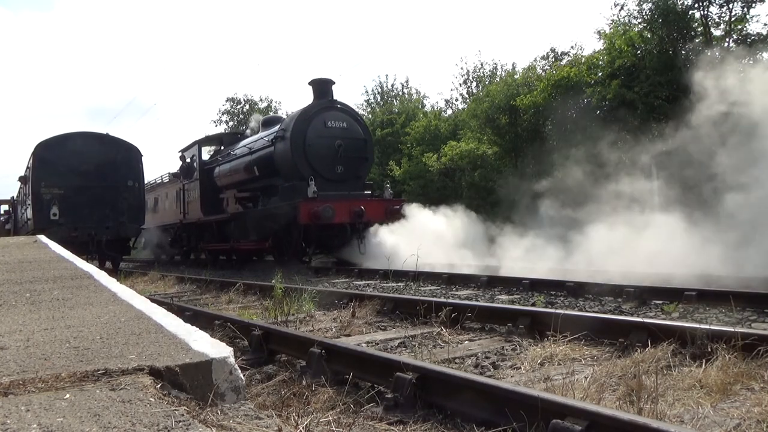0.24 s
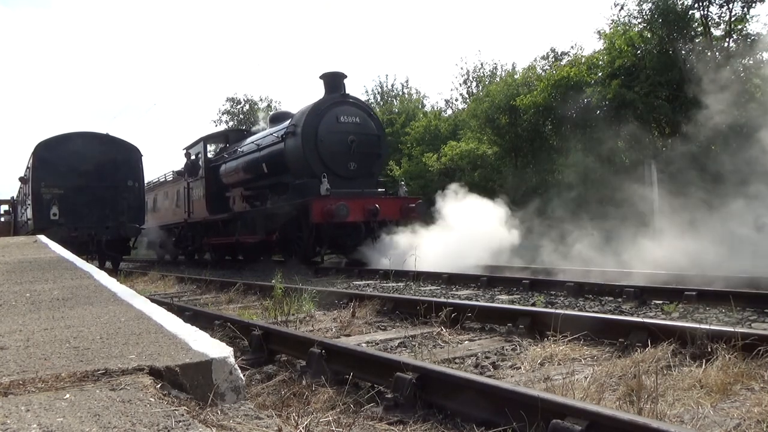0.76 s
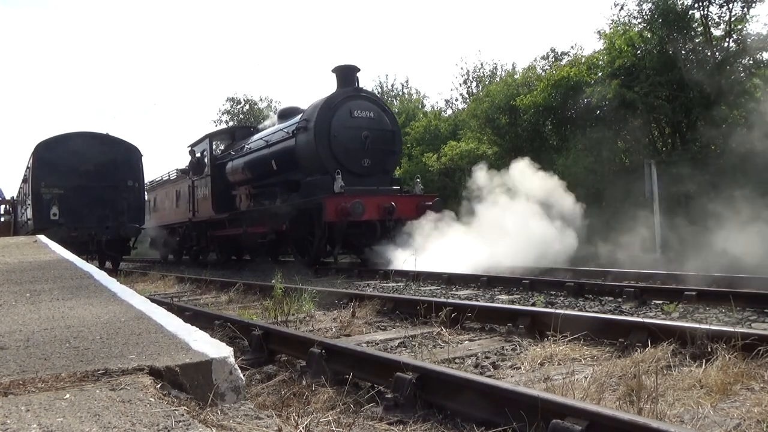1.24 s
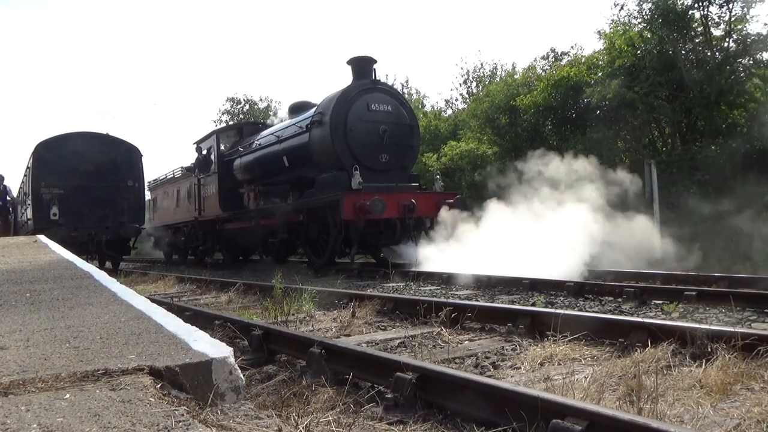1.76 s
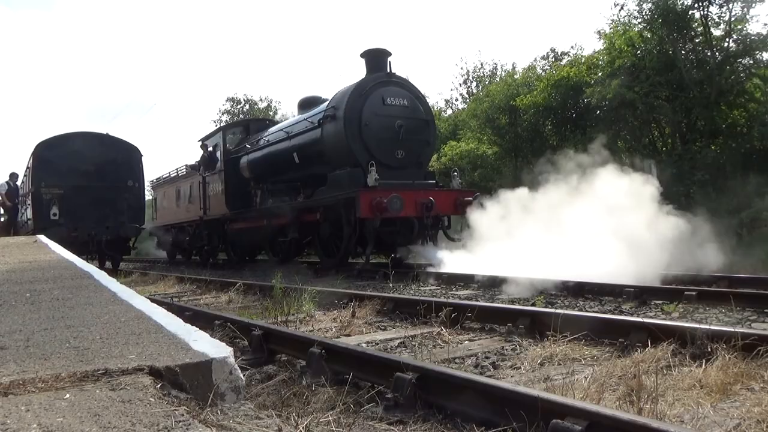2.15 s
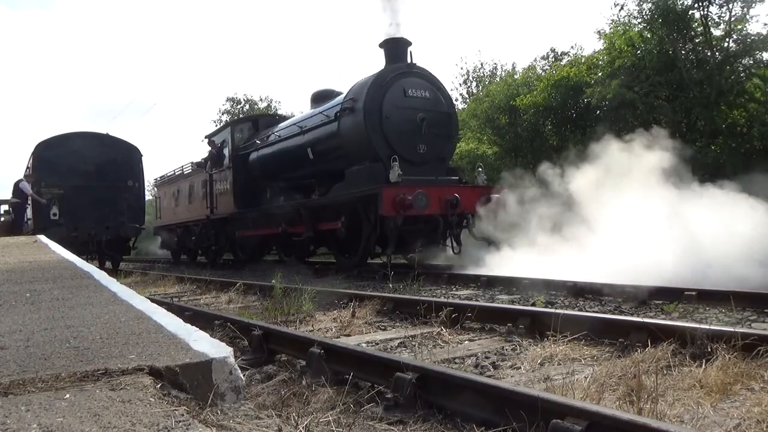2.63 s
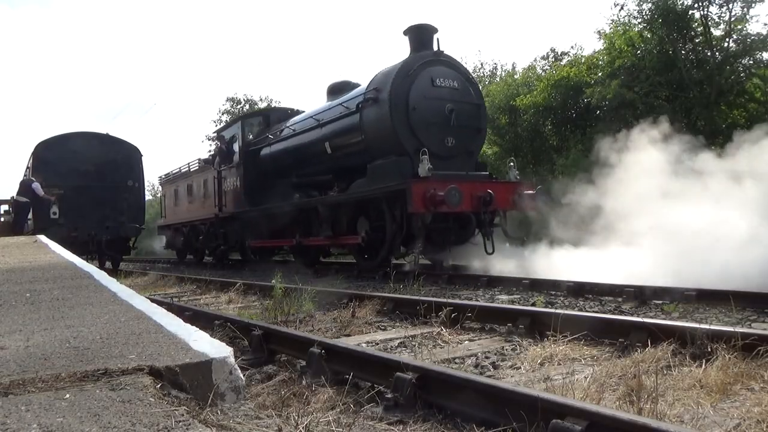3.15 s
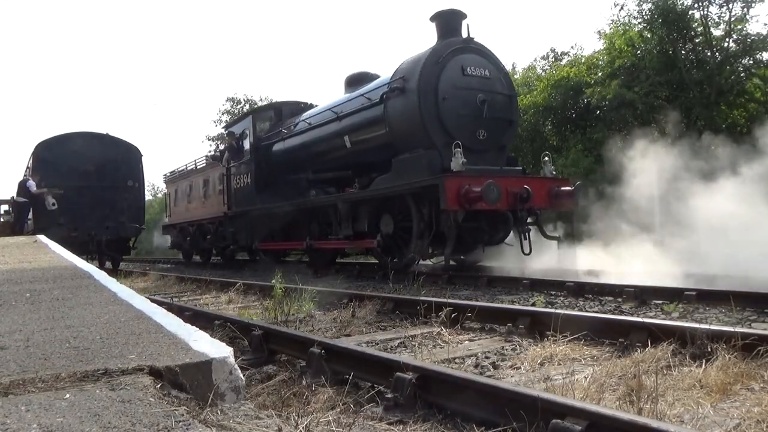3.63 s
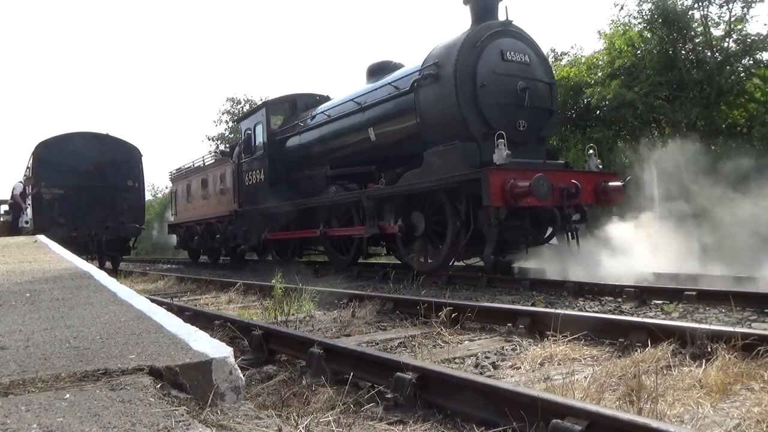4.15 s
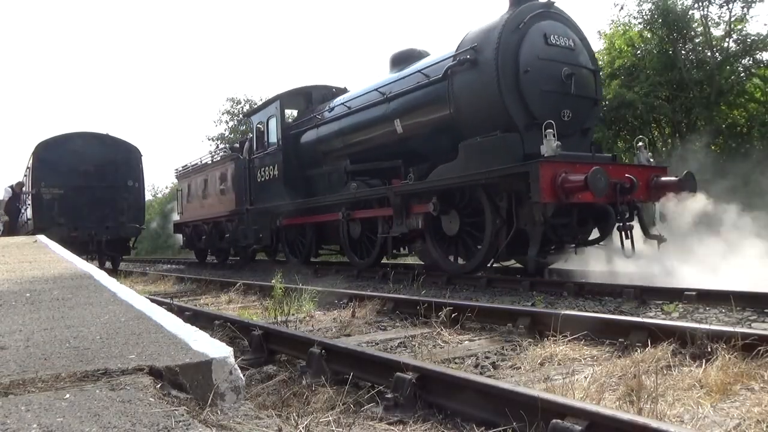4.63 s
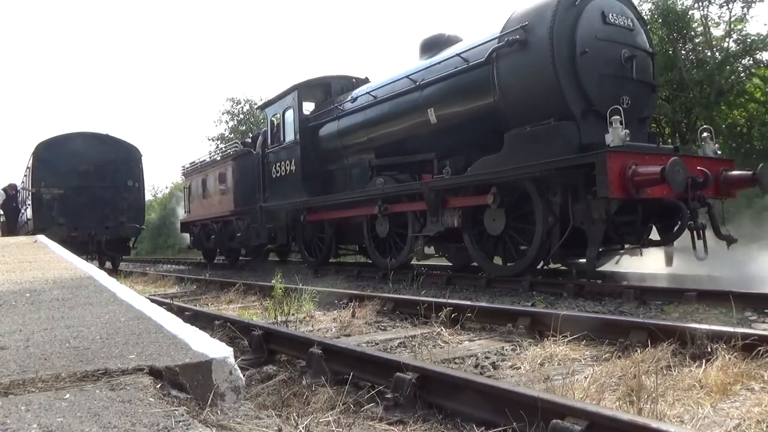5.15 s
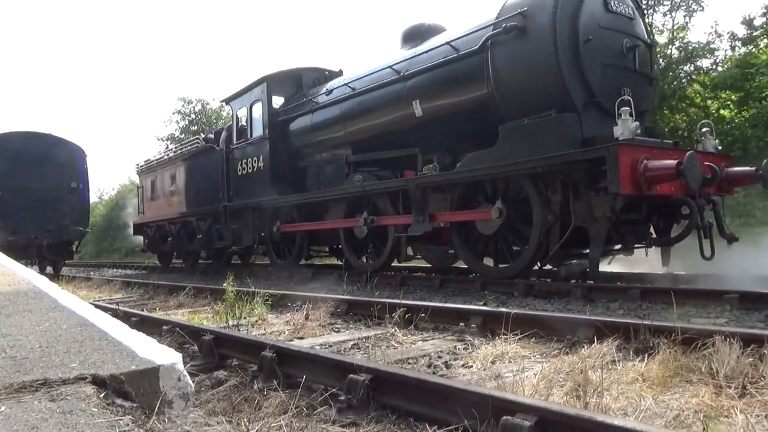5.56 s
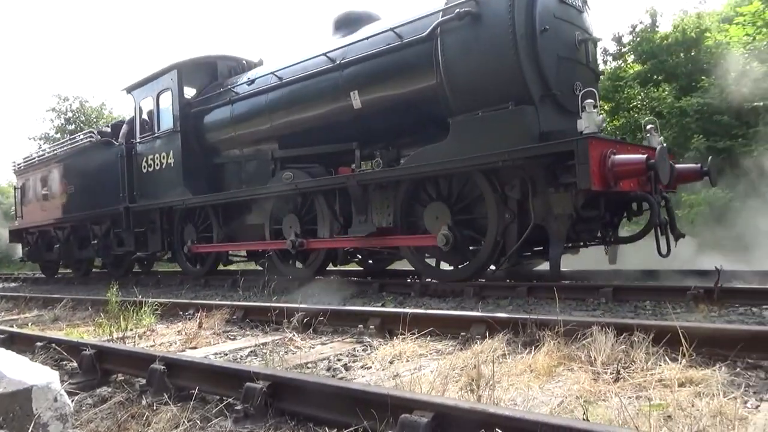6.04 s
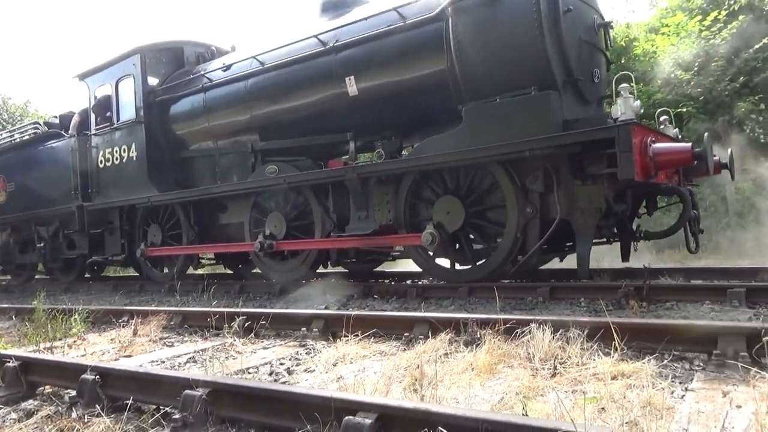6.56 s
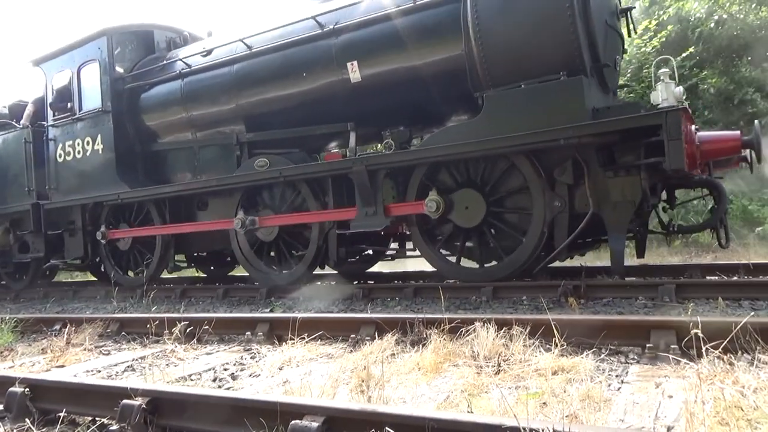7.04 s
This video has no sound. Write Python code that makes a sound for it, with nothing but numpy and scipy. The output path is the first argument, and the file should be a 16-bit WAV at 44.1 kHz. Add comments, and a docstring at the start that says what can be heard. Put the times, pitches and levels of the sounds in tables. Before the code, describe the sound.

Piercing steam jet hisses for three seconds, stops dead, leaving soft puffs and low murmur before heavy wheels shudder, knock and clank up close.

```python
"""Beside a railway track: a steam locomotive creeps closer, its cylinder drain cocks blowing hard.
The jet is noise in three bands, recoloured as the pistons move; it shuts off suddenly, then puffs softly.
The wheels rumble, knock and grind: judder noise through track and steel filters, and blows on resonances.
Sharp steel clanks add broadband cracks and thin rings. A low boiler murmur swells with the exhaust beats."""
import sys
import numpy as np
from scipy import signal
from scipy.fft import rfft, irfft, next_fast_len
from scipy.io import wavfile
from scipy.ndimage import uniform_filter1d, minimum_filter1d, map_coordinates

SR = 44100
rng = np.random.default_rng(int(sys.argv[2]) if len(sys.argv) > 2 else 0)


def digitize_waveform(pressure):
    """Quantize a signal to 16-bit integers and store it at the path in sys.argv[1].

    Rows of a 2-D input are taken as channels; values are limited to [-1, 1].
    """
    field = np.atleast_2d(pressure).T
    bounded = np.clip(field, -1, 1)
    quanta = np.round(bounded * 32767).astype(np.int16)
    wavfile.write(sys.argv[1], SR, quanta)


N = 321930

# wheel and rail resonances: (frequency [Hz], width [Hz], relative level [dB])
WHEEL_MODES = [(548, 73, 1.5), (830, 100, 0), (937, 32, 5.5), (1151, 105, 1), (1371, 66, 0.5),
               (1512, 27, -1), (1644, 98, -1.5), (1810, 71, 0), (2143, 85, -5.5), (2900, 770, -15.5),
               (3650, 780, -20)]
# colour of the track's thud: (frequency [Hz], relative level [dB])
TRACK_COLOUR = [(25, -32), (60, -49), (110, -16.5), (200, -4), (290, 0), (380, -2.5), (480, -4),
                (590, -13.5), (720, -22), (1500, -35), (4000, -66)]
# weight on the nearby rail as the engine arrives: (time [s], load [0-1])
RAIL_LOAD = [(5.4, 0), (6.1, .35), (6.24, .85), (6.85, .85), (7, 1)]


def amp(db):
    """Decibels to gain."""
    return 10 ** (np.asarray(db) / 20)


def unit(x):
    """Scale to rms 1."""
    return x / np.sqrt(np.mean(x ** 2) + 1e-20)


def along(points, hz):
    """Interpolate (Hz, value) points on a log axis."""
    f, v = np.transpose(points)
    return np.interp(np.log(hz + 1), np.log(f + 1), v)


def curves(rows, at_s=None):
    """Each column after the time, per sample or at the given times."""
    s, *cols = np.transpose(rows)
    if at_s is None:
        at_s = np.arange(N) / SR
    return [np.interp(at_s, s, c) for c in cols]


def wobble(rate_hz):
    """A smooth random curve, rate_hz knots a second."""
    knots = rng.standard_normal(int(N * rate_hz / SR) + 4)
    return map_coordinates(knots, [np.arange(N) * rate_hz / SR])


def filtered(x, response):
    """Filter x by a complex response of frequency."""
    n = x.shape[-1]
    m = next_fast_len(n + 8192, True)
    return irfft(rfft(x, m) * response(np.fft.rfftfreq(m, 1 / SR)), m)[..., :n]


def add(track, s, sound):
    """Mix a sound into a track at s seconds."""
    part = track[:, round(s * SR):][:, :sound.shape[-1]]
    part += sound[:, :part.shape[-1]]


def stereo(pair):
    """Two unrelated signals become mid and side; the side's share depends on frequency."""
    # (frequency [Hz], side to mid [dB])
    side_db = [(30, -9), (70, -18), (250, -31), (550, -13), (1100, -11.5), (2200, -34), (4500, -39),
               (8000, -36), (14000, -45)]
    mid = pair[0]
    side = filtered(pair[1], lambda hz: amp(along(side_db, hz)))
    return np.array([mid + side, mid - side])


def turbulence(shape, spread, patchy_db):
    """Stereo noise whose gain is shape(s, Hz), with drifting patches of random gain."""
    hz, s, z = signal.stft(rng.standard_normal((2, N)), SR, nperseg=512)
    field = uniform_filter1d(rng.standard_normal(z.shape[1:]), size=2, axis=0)
    field = uniform_filter1d(field, size=18, axis=1)
    mid, side = z * (shape(s, hz[:, None]) * amp(patchy_db * unit(field)))
    side = side * amp(along(spread, hz[:, None]))
    return signal.istft(np.array([mid + side, mid - side]), nperseg=512)[1][:, :N]


def steam(roar_edge_hz=3590, fizz_edge_hz=8520, pipe_hz=3050, pipe_width_hz=110):
    """Large eddies roar, small ones hiss and fizz; the opening sets the colour of all three."""
    # jet colours: (frequency [Hz], relative level [dB])
    narrow = [(450, -54), (850, -32), (1600, -16.0), (2000, -13.0), (2450, -16), (3300, -11.0),
              (4100, -2.5), (4900, 0.5), (5700, -1.5), (7300, -0.5), (8700, -5), (10200, -4),
              (12500, -16.0), (15500, -24.5)]
    wide = [(450, -55), (800, -32), (1050, -20.5), (1700, -9), (3050, -1.5), (4700, 1), (5600, -5.5),
            (6400, -1), (7500, -2), (8300, -5.5), (8950, -14), (10100, -6), (12000, -19.5), (15500, -28)]
    closing = [(450, -59), (850, -26.5), (1250, -17), (1900, -9.5), (3000, -3.5), (3600, -8.5),
               (5300, -7.5), (6200, -2), (7200, -2), (8700, -8.5), (9900, -5.5), (11000, -10), (12500, -14),
               (15500, -25)]
    spent = [(450, -20), (750, -15.5), (1200, -4), (1700, 1.5), (2400, 2), (3700, -3.5), (5700, -5.5),
             (7100, -2.5), (8800, -9), (10300, -10.5), (12500, -18), (15500, -35)]
    # (time [s], colour [0 narrow, 1 wide, 2 closing, 3 spent])
    stage_rows = [(0, 0), (1, 0), (1.1, 1), (1.65, 1), (2.1, 1.25), (2.35, 1.55), (2.7, 2), (3.3, 2),
                  (3.42, 3), (3.75, 2.8), (3.95, 2.1), (4.25, 3)]
    # drain pipe's narrow resonance: (time [s], relative boost [dB])
    pipe_rows = [(0, -3), (1.2, 2), (2.3, 1.5), (2.7, 5.5), (3.3, 0)]
    # (frequency [Hz], side to mid [dB])
    jet_side_db = [(700, -16), (1200, -25), (2200, -36), (4500, -42), (14000, -42)]
    # (time [s], left minus right [dB])
    pan_rows = [(0, 0), (4, 0), (4.5, -.8), (4.85, -2.7), (5.7, -2.4), (5.9, -.5)]

    def below(hz, edge_hz):
        return 1 / (1 + (hz / edge_hz) ** 16)

    def shape(s, hz):
        stage, = curves(stage_rows, s)
        tint_db = 0
        for k, points in enumerate([narrow, wide, closing, spent]):
            blend = np.clip(1 - np.abs(stage - k), 0, 1)  # neighbouring colours melt together
            tint_db = tint_db + blend * along(points, hz)
        pipe_db, = curves(pipe_rows, s)
        tint = amp(tint_db) * amp(pipe_db / (1 + ((hz - pipe_hz) / pipe_width_hz) ** 2))
        under_roar, under_fizz = below(hz, roar_edge_hz), below(hz, fizz_edge_hz)
        shares = [under_roar, under_fizz - under_roar, 1 - under_fizz]
        power = 0
        for share, level_db in zip(shares, jet_levels(s)):
            eddies = np.abs(share) * tint ** 2
            flutter_db = 0.43 * unit(uniform_filter1d(rng.standard_normal(len(s)), size=4))
            power = power + eddies / eddies.mean(axis=0) * amp(level_db + flutter_db) ** 2
        return np.sqrt(power)

    pan_db, = curves(pan_rows)
    jet = turbulence(shape, jet_side_db, patchy_db=1.52)
    return amp(0.06) * jet * amp(np.array([pan_db, -pan_db]) / 2)


def jet_levels(s):
    """Roar, hiss and fizz in dB: leak, blasts and puffs add in power; exhaust beats rob hiss and fizz."""
    # steady leak: (time [s], roar [dB], hiss [dB])
    leak_rows = [(4.45, -46, -48), (4.64, -52.5, -51.5), (4.78, -45.5, -45.5), (5.45, -47.5, -47.5),
                 (5.8, -54, -49.5), (6.4, -49.5, -50), (7.3, -48, -46)]
    # one blast per port opening, levels at mid-blast:
    # (opens [s], shuts [s], roar [dB], hiss [dB], fizz [dB], sharpening [dB/s])
    blast_rows = [(-0.2, 1.07, -41, -27, -32.5, -3.5), (1.04, 2.224, -29.5, -27.3, -37.5, 1.5),
                  (2.23, 2.514, -31, -27.8, -33.7, 5), (2.53, 3.306, -37, -26.5, -33.5, 10.5)]
    # low-pressure puffs: (peak [s], rise [s], fall [s], roar [dB], hiss [dB], fizz [dB])
    puff_rows = [(3.42, 0.17, 0.29, -49.5, -39, -47.5), (3.98, 0.11, 0.052, -45.5, -31.5, -45.5),
                 (4.15, 0.095, 0.15, -44.5, -34, -43.5), (4.315, 0.061, 0.054, -36.5, -48, -63),
                 (4.96, 0.078, 0.052, -40.5, -40.5, -56), (5.06, 0.087, 0.063, -44.5, -39, -53.5),
                 (5.69, 0.11, 0.035, -47, -42.5, -62)]
    # fizz brightens and dulls: (time [s], added level [dB])
    fizz_rows = [(0.1, 0.5), (0.33, -1), (0.58, 1), (0.68, -2.5), (0.86, 2.5), (1.0, 0.5), (1.25, -1),
                 (1.5, -0.8), (1.9, -0.5)]
    leak_fizz_db = -11  # relative to the leak's hiss
    open_s, shut_s = 0.011, 0.011  # time scales of the port's edges
    hiss_share, fizz_share = 0.18, 0.15  # gain per dB the roar loses as the jet sharpens
    rob_db, rob_at_db = 2.5, -51.5  # loss caused by a beat of this level

    def bands(*levels_db):
        return amp(np.reshape(np.broadcast_arrays(*levels_db), (3, -1))) ** 2

    def gate(u):
        return (1 + np.tanh(u / 2)) / 2

    roar, hiss = curves(leak_rows, s)
    power = bands(roar, hiss, hiss + leak_fizz_db)
    for opens, shuts, roar, hiss, fizz, sharpening in blast_rows:
        port = gate((s - opens) / open_s) * gate((shuts - s) / shut_s)
        shift_db = sharpening * (np.clip(s, opens, shuts) - (opens + shuts) / 2)
        blast = bands(roar - shift_db, hiss + hiss_share * shift_db, fizz + fizz_share * shift_db)
        power = power + port * blast
    for peak, rise, fall, roar, hiss, fizz in puff_rows:
        swell = np.exp(-((s - peak) / np.where(s < peak, rise, fall)) ** 2)
        power = power + swell * bands(roar, hiss, fizz)
    roar, hiss, fizz = 10 * np.log10(power)
    robbed_db = rob_db * np.sqrt(exhaust(s)) / amp(rob_at_db)
    return roar, hiss - robbed_db, fizz - robbed_db + curves(fizz_rows, s)[0]


def exhaust(s, rise_s=0.037):
    """Power of the exhaust beats: each swells quickly, peaks after rise_s and dies away."""
    # soft beats: (start [s], peak level [dB])
    chuff_rows = [(1.02, -53.5), (1.6, -50.5), (2.09, -57), (2.47, -50), (3.34, -65), (4.03, -51.5)]
    power = 0
    for start, db in chuff_rows:
        age = np.maximum(s - start, 0) / rise_s
        power = power + (amp(db) * age * np.exp(1 - age)) ** 2
    return power


def leaning(pair):
    """The jet's left-right treble balance shifts as it draws near."""
    # far and near balance: (frequency [Hz], left minus right [dB])
    far_db = [(3500, -0.2), (4500, 0.3), (6200, 0.8), (8000, 2.1), (8900, 0)]
    near_db = [(8700, 0), (9400, -2.5), (11000, -2.3), (12000, 0)]
    # (time [s], nearness [0 far, 1 near])
    near_rows = [(1, 0), (2.1, 0.35), (2.6, 1)]

    def lean(points):
        return filtered(pair, lambda hz: amp(np.outer([1, -1], along(points, hz)) / 2))

    near = np.clip(curves(near_rows)[0], 0, 1)
    return (1 - near) * lean(far_db) + near * lean(near_db)


def steel(hz):
    """Response of the ringing wheel and rail: resonances of alternating sign."""
    total = 0
    for k, (center, width, db) in enumerate(WHEEL_MODES):
        damping = 1j * hz * width
        total = total + (-1) ** k * amp(db) * damping / (center * center - hz * hz + damping)
    return total


def rolling():
    """Juddering tyres: the track drones hollowly, rumbles more under load; wheels grind at their own level."""
    # (time [s], relative rumble [dB], grinding [dB])
    roll_rows = [(3.4, -80, -86.5), (4.1, -62, -61), (5.08, -58.5, -65), (5.25, -36, -63), (5.42, -50, -52),
                 (5.68, -32, -56), (5.9, -34.5, -44.5), (6.18, -40, -60), (6.4, -50, -42.5),
                 (6.58, -43, -51), (6.82, -32, -41.5), (6.95, -28.5, -33), (7.08, -28.5, -29),
                 (7.3, -29, -37)]
    hollow_db = [(100, -29.5), (230, -8), (300, -4.5), (350, -0.5), (430, -12.0), (900, -60)]
    rumble_db, grind_db = curves(roll_rows)
    load, = curves(RAIL_LOAD)
    contact = stereo(rng.standard_normal((2, N)))
    judder = amp(2.5 * wobble(55)) * contact
    slips = amp(2.6 * wobble(70)) * contact  # the flange sticks and slips in short scrapes
    hollow = unit(filtered(judder, lambda hz: amp(along(hollow_db, hz))))
    rumble = unit(filtered(judder, lambda hz: amp(along(TRACK_COLOUR, hz))))
    grind = unit(filtered(slips, steel))
    track = amp(-4.5) * hollow + load * amp(-11.0) * rumble
    return amp(rumble_db) * track + amp(grind_db) * grind


def burst(response, t60, attack):
    """A contact chatters briefly into a body; rms 1 over its first 20 ms."""
    t = np.arange(SR // 5) / SR
    force = rng.standard_normal((2, len(t))) * amp(-60 * t / max(t60, .005)) * (1 - np.exp(-t / attack))
    sound = filtered(force, response)
    return sound / sound[:, :SR // 50].std(axis=1, keepdims=True)


def boom(hz, t60, rise):
    """One resonance, set ringing by a short, smooth push."""
    t = np.arange(SR // 5) / SR
    phase = rng.uniform(0, 2 * np.pi, (2, 1))
    return np.sin(2 * np.pi * hz * t + phase) * (amp(-60 * t / t60) * (1 - np.exp(-t / rise)) ** 2)


def blow(s, hz, thud_db, ring_db, t60=0.11):
    """A blow booms in the track and rings the wheel; the more load, the broader the thud."""
    load, = curves(RAIL_LOAD, s)
    broad_db = -19 + 12 * load
    broad = burst(lambda f: amp(along(TRACK_COLOUR, f)), t60, attack=0.0018)
    thud = amp(-2.0) * boom(hz, t60, rise=0.0022) + amp(broad_db) * broad
    # every blow finds a new mix of the wheel's modes; narrow ones ring longest
    ring = 0
    for center, width, db in WHEEL_MODES:
        gain = amp(db + rng.normal(0, 10.0))
        ring = ring + gain * boom(center * rng.normal(1, 0.015), 7.2 / width, rise=0.00047)
    scrape = burst(steel, t60=0.17, attack=.0005)
    wheel = amp(-11.0) * ring / ring[:, :SR // 50].std() + amp(-6) * scrape
    return amp(thud_db) * thud + amp(ring_db) * wheel


def shudders(ring_db=-22, gap_shrink=0.88, t60=0.1):
    """A shuddering tyre's runs of soft thumps, ever closer, boom in the track and barely stir the wheel."""
    # (start [s], count, first gap [s], first thump [relative dB], loss per thump [dB], mean pitch [Hz])
    shudder_rows = [(5.093, 2, 0.036, -37, -3.5, 327), (5.162, 2, 0.02, -24.5, 10, 322),
                    (5.224, 4, 0.032, -25, 2, 307), (5.435, 2, 0.04, -34, -13.5, 322),
                    (5.495, 1, 0.02, -20, 2, 340), (5.552, 2, 0.017, -20, -0.5, 355),
                    (5.608, 3, 0.021, -16.5, 2, 306), (5.679, 3, 0.051, -18, 5, 316),
                    (6.08, 5, 0.031, -20, 1.3, 331)]
    track = np.zeros((2, N))
    for s, count, gap, first_db, loss_db, hz in shudder_rows:
        for k in range(round(count)):
            db = first_db - loss_db * k
            add(track, s, blow(s, hz * rng.normal(1, .04), db, db + ring_db, t60))
            s = s + gap * gap_shrink ** k
    return stereo(track)


def knocks(count=4, rattle_s=0.025):
    """Slack in the running gear takes up with dull blows; loose fittings rattle within rattle_s of each."""
    # (time [s], relative thud [dB], relative ring [dB], pitch [Hz])
    knock_rows = [(5.822, -15, -35.5, 253), (5.938, -17, -33, 260.6), (5.997, -18, -41.5, 220),
                  (6.237, -18.5, -28, 414), (6.293, -20, -28, 435), (6.38, -25, -32, 353),
                  (6.913, -24.5, -28, 408), (6.944, -33, -26.5, 380), (7.034, -25, -28.5, 374),
                  (7.151, -38, -20.5, 326)]
    # colour of the fittings: (frequency [Hz], relative level [dB])
    rattle_db = [(700, -16), (1700, 7), (3500, -10), (5000, -20), (12000, -35)]
    track = np.zeros((2, N))
    for s, thud_db, ring_db, hz in knock_rows:
        add(track, s, blow(s, hz, thud_db, ring_db))
        for delay in rattle_s * rng.random(count):
            tick = burst(lambda f: amp(along(rattle_db, f)), t60=0.02, attack=0.00039)
            add(track, s + delay, amp(ring_db + rng.normal(-15, 1.6)) * tick)
    return stereo(track)


def clanks(thud_hz=375, ring_db=-8.5, thud_lag_s=0.00198):
    """Hard contacts crack over the whole band, ring thinly in the rods and thud into the track just after."""
    # (time [s], relative crack [dB], relative thud [dB], rod's ring [Hz])
    clank_rows = [(5.8389, -25, -38, 4130), (5.9033, -28.5, -33, 4980), (6.0938, -21, -23.5, 4470),
                  (6.3409, -21, -19.5, 3980), (6.5933, -19.5, -15, 5030), (6.7372, -21, -17, 3960),
                  (6.8454, -24, -16.5, 3860), (6.965, -21, -19, 3950), (7.078, -22.5, -19.5, 6800),
                  (7.1303, -23, -18.5, 3970), (7.217, -22.5, -18.5, 3830), (7.2851, -22, -19.5, 4000)]
    # (frequency [Hz], relative level [dB])
    crack_colour = [(200, -13), (600, -2.5), (2000, 4.5), (4500, 1), (8500, 0), (11000, -8), (15500, -27)]
    track = np.zeros((2, N))
    for s, crack_db, thud_db, rod_hz in clank_rows:
        crack = burst(lambda hz: amp(along(crack_colour, hz)), t60=0.085, attack=0.00032)
        add(track, s, amp(crack_db - 11.0) * crack)
        add(track, s, amp(crack_db - 20.0) * boom(rod_hz, t60=0.16, rise=0.0017))
        add(track, s + thud_lag_s, blow(s, thud_hz, thud_db, thud_db + ring_db))
    return stereo(track)


def off_axis(pair):
    """Sound from the side reaches left and right out of step."""
    # (frequency [Hz], left's lead [rad])
    lead_rad = [(0, 0), (340, 0.66), (1720, 0.3), (15300, -0.0)]
    return filtered(pair, lambda hz: np.exp(.5j * np.outer([1, -1], along(lead_rad, hz))))


def lineside(x):
    """Boiler, platform and trees scatter a short tail: decaying noise convolved with the mono sound."""
    # (frequency [Hz], t60 [s])
    tail_t60 = [(200, 0.64), (1500, 0.24), (6000, 0.38), (14000, 0.49)]
    hz, t, z = signal.stft(rng.standard_normal((2, SR // 2)), SR, nperseg=256)
    decay = amp(-60 * t / along(tail_t60, hz)[:, None])
    tail = stereo(signal.istft(z * decay, SR, nperseg=256)[1])
    return signal.fftconvolve(x.mean(axis=0)[None], tail / np.linalg.norm(tail[0]), axes=1)[:, :N]


def boiler():
    """A low murmur from fire and plume, swelling with each soft exhaust beat."""
    # steady murmur: (time [s], level [dB])
    boiler_rows = [(0.3, -59), (1.5, -58.5), (2.85, -60.5), (3.45, -58.5), (4.6, -60.5)]
    # its colour: (frequency [Hz], relative level [dB])
    murmur_db = [(25, -24), (60, -24.5), (110, -10), (180, -11.5), (280, -6), (420, -1), (590, -2.5),
                 (700, -7), (1000, -6.5), (1500, -23.5)]

    def shape(s, hz):
        level = np.sqrt(amp(curves(boiler_rows, s)[0]) ** 2 + exhaust(s))
        return level * unit(amp(along(murmur_db, hz)))

    return turbulence(shape, [(100, -50), (600, -26)], patchy_db=2.0)


def scene():
    """Steam ahead, running gear slightly to the right, and the boiler's murmur."""
    blows = shudders() + knocks() + clanks()
    gear = off_axis(blows + amp(-8.0) * lineside(blows) + rolling())
    return leaning(steam()) + boiler() + gear * amp([[-.4], [.4]])


def record(dry, low_cut_hz=44, top_hz=15800):
    """A limiter reins in the highest peaks; deep bass and everything above top_hz are cut."""
    ceiling = amp(-12.3)
    needed = np.minimum(1, ceiling / (np.abs(dry).max(axis=0) + 1e-9))
    gain = uniform_filter1d(minimum_filter1d(needed, size=220), size=220)
    return filtered(dry * gain, lambda hz: (hz < top_hz) * hz ** 2 / (hz ** 2 + low_cut_hz ** 2))


dry = scene()
out = record(dry)
digitize_waveform(out)
```